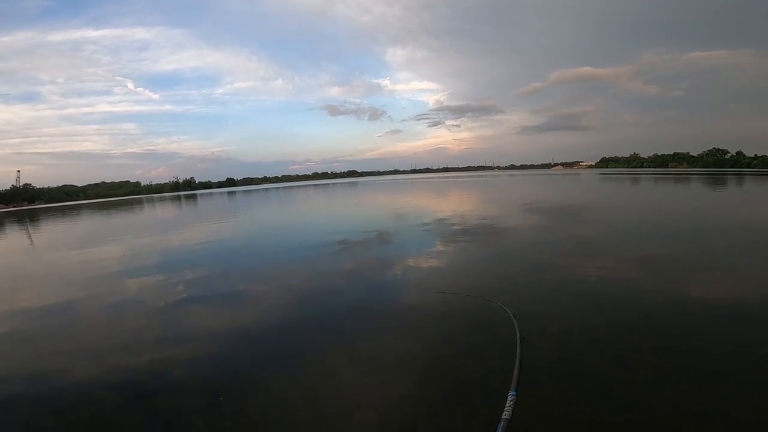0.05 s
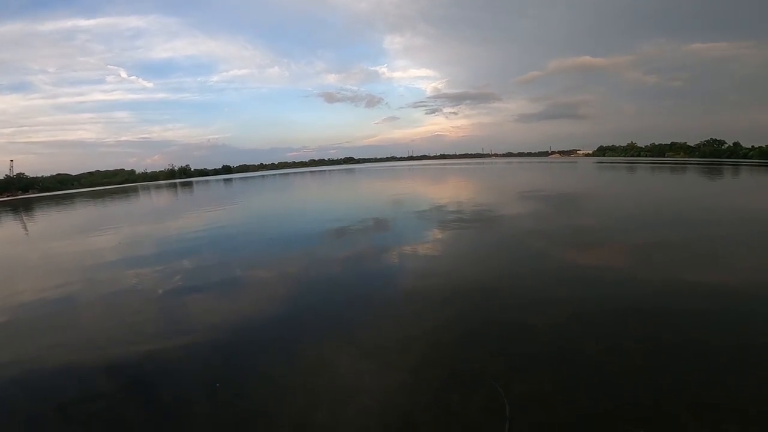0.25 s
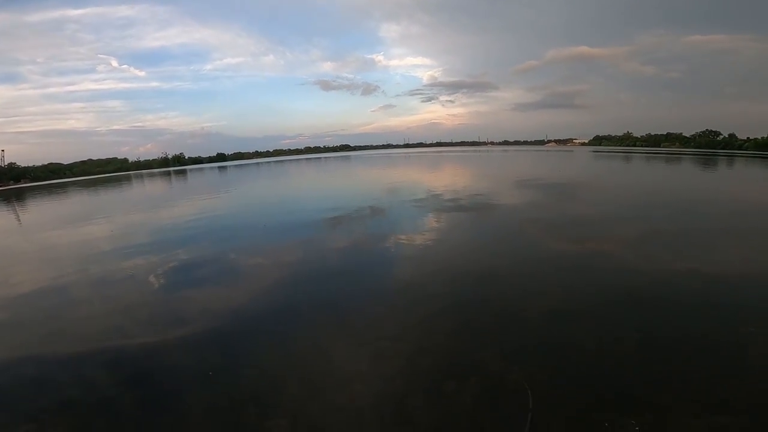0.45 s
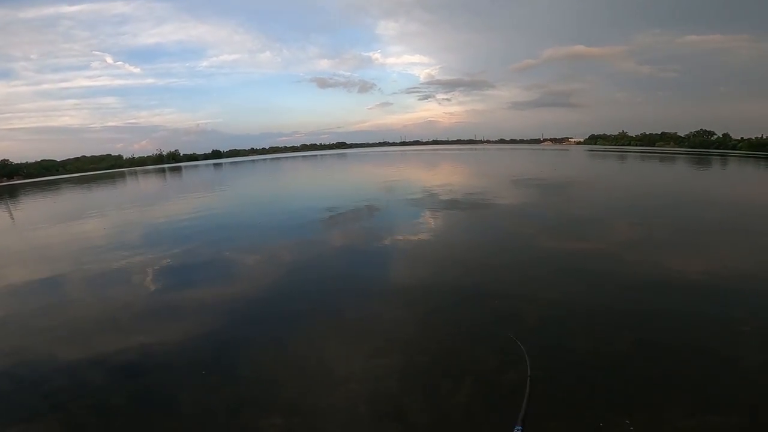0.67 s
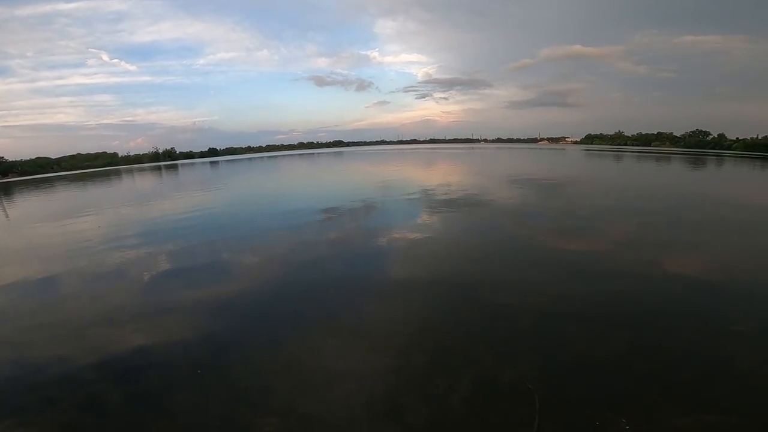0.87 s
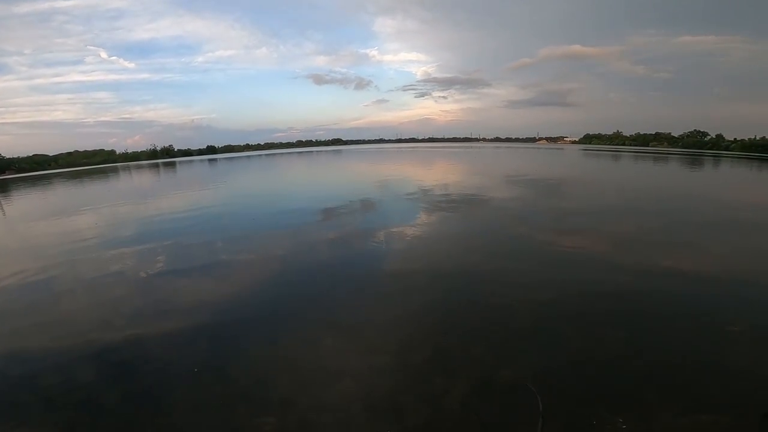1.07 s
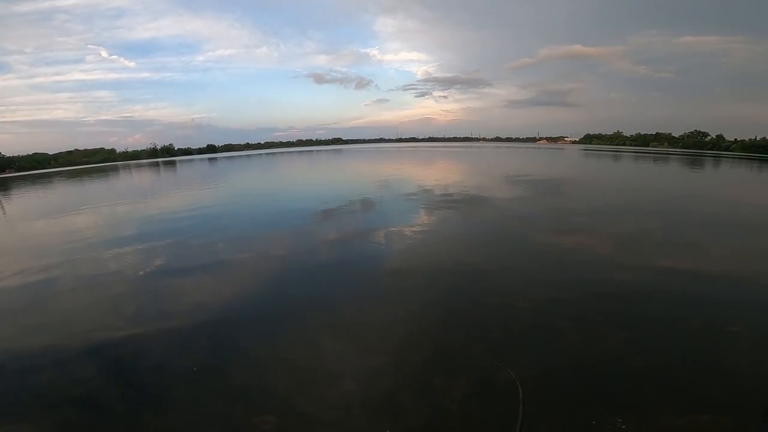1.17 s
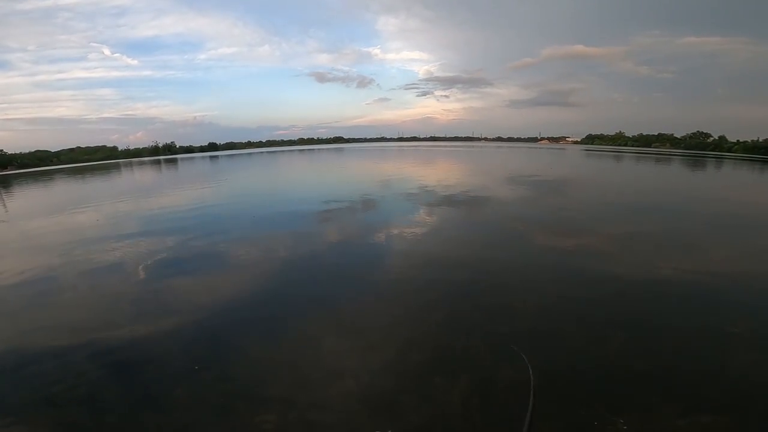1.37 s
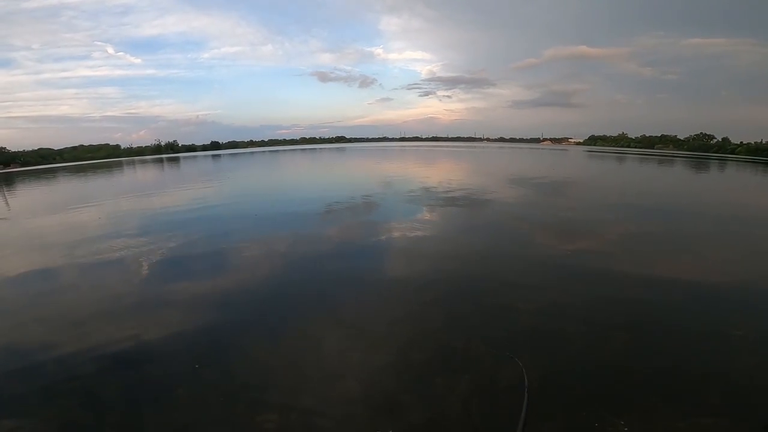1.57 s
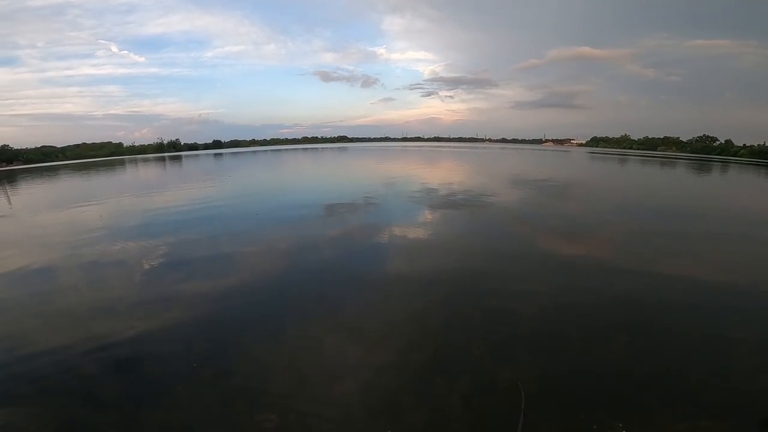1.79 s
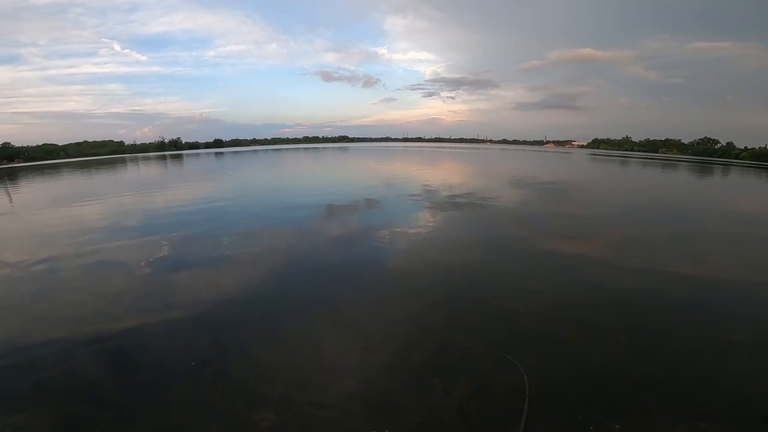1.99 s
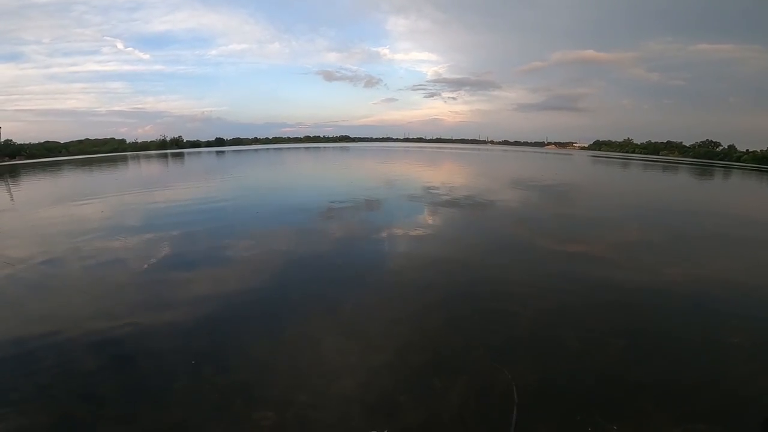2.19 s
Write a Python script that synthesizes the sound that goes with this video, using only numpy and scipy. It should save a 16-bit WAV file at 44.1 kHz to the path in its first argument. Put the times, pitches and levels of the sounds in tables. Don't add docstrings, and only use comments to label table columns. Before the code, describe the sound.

A spinning fishing reel is wound fast right by a chest-worn microphone outdoors at a quiet lake, its rough gear whine rising and falling, with regular clicks, small rattles and two low thumps of the rod butt.

```python
import sys
import numpy as np
from scipy import signal
from scipy.fft import rfft, irfft, next_fast_len
from scipy.io import wavfile
from scipy.ndimage import uniform_filter1d, map_coordinates

SR = 44100
rng = np.random.default_rng(int(sys.argv[2]) if len(sys.argv) > 2 else 0)


def nominal_scale(level):
    x = np.asarray(level, float) / 20
    return 10 ** x


def master_out(mix):
    frames = np.transpose(np.atleast_2d(mix))
    ceiling = np.clip(frames, -1, 1)
    pcm = np.round(ceiling * 32767).astype(np.int16)
    wavfile.write(sys.argv[1], SR, pcm)


N = 98607
T = np.arange(N) / SR

# start_s, tooth_pitch_hz, whine_level_db
HANDLE_TURNS = [
    [(0, 1252, -43), (.022, 650, -46), (.075, 391, -47.5), (.108, 578, -45), (.17, 543.4, -55),
     (.197, 733, -43), (.225, 600, -48.5), (.275, 465, -46), (.314, 680, -49)],
    [(.333, 1120, -40), (.348, 1100, -46), (.375, 640, -58), (.432, 485, -42), (.462, 399, -46),
     (.495, 700, -57), (.545, 414, -46), (.575, 530, -44.5), (.598, 770, -42)],
    [(.612, 1119, -45.5), (.628, 1240, -44), (.642, 899, -66), (.67, 739, -46), (.688, 641.6, -52),
     (.706, 790, -43), (.724, 780, -41.5), (.757, 429.3, -45.5)],
    [(.78, 550.4, -48), (.8, 670, -40), (.825, 466, -48), (.85, 650, -50), (.882, 790, -44), (.9, 962, -41),
     (.913, 1150, -37), (.928, 1050, -56)],
    [(.95, 638, -68), (.992, 599.4, -36.5), (1.026, 800.4, -46.5), (1.05, 719, -40.5), (1.075, 509.3, -49),
     (1.145, 395, -45.5), (1.185, 431.5, -42), (1.22, 760, -44)],
]
# start_s, tooth_pitch_hz, whine_level_db
LATER_TURNS = [
    [(1.235, 950, -41), (1.252, 1260, -38), (1.268, 1270, -40), (1.282, 900, -70), (1.32, 570, -45),
     (1.335, 660, -43.5), (1.355, 810, -37.5), (1.38, 805, -41), (1.425, 460, -47)],
    [(1.445, 450, -55), (1.475, 490, -43.5), (1.51, 530, -43.5), (1.545, 740, -46), (1.562, 930, -38),
     (1.582, 1060, -38.5), (1.594, 800, -59), (1.612, 400, -43)],
    [(1.632, 580, -47), (1.66, 620, -46.5), (1.682, 800, -40), (1.705, 720, -46), (1.745, 401.3, -52),
     (1.79, 770, -44.5), (1.82, 450, -50), (1.86, 740, -42), (1.9, 820, -44)],
    [(1.925, 680, -54), (1.95, 490, -45.5), (1.985, 590, -45), (2.012, 580, -45), (2.05, 450, -47),
     (2.112, 640, -44), (2.155, 400, -46), (2.2, 530, -41), (2.236, 830, -40.5)],
]
# multiple, level_db
TOOTH_OVERTONES = [(2, -7), (3, -6), (4, 0), (4.6, -11), (6, -15)]
# start_s, load_db, line_scrape_db
EFFORT = [(0, -38.5, -68.5), (.15, -42.5, -74), (.3, -41, -74), (.45, -38.5, -75.5), (.6, -38, -70),
          (.7, -38.5, -67.5), (.79, -39.5, -70.5), (.85, -37.5, -63), (1, -37, -68), (1.12, -38, -69.5),
          (1.22, -34.5, -68.5), (1.285, -40, -70.5), (1.39, -40, -67), (1.45, -38, -76.5),
          (1.74, -38, -71.5), (1.87, -37.5, -67), (2.05, -36.5, -68.5), (2.236, -36, -69)]
# start_s, rumble_db, extra_rattle_db
GRIP = [(0, -38.5, -0.5), (.07, -41.5, -3), (.14, -41.5, -4.5), (.3, -43.5, -9.5), (.45, -42, -6),
        (.57, -41, -3.5), (.67, -40, -2.5), (.75, -43, -2), (.84, -43, -4.5), (.9, -43.5, 9),
        (1.01, -43, 7.5), (1.09, -42, -2), (1.3, -38.5, -1.5), (1.45, -42, -8.5), (1.6, -42, -4),
        (1.85, -41.5, 6.5), (2.08, -39, 0.5), (2.236, -41.5, 0)]
# pitch_hz, level_db
GRIND_COLOUR = [(500, -7.5), (900, -2.5), (1800, 0.5), (3100, -5), (3500, -2.5), (5100, -10.5), (6000, -16),
                (9000, -61.5)]
# pitch_hz, width_hz, boost_db
HOUSING = [(1690, 300, 1.5), (2325, 260, 4), (2927, 270, 3.5), (4884, 600, 8)]
# pitch_hz, level_db
SCRAPE_COLOUR = [(5500, -3), (7000, -4), (9000, -14), (12000, -21), (13500, -28), (15200, -40)]
# pitch_hz, level_db
RUMBLE_COLOUR = [(22, -3), (33, 2.5), (80, -3), (190, -3.5), (300, -9), (500, -21.5)]
# pitch_hz, level_db
RATTLE_COLOUR = [(150, -19), (350, -1.5), (500, -2), (950, -1.5), (1700, -9), (2600, -26)]
# start_s, peak_db, edge_db
CLICKS = [
    (0.3333, -14, -27),
    (0.6216, -15, -28.5),
    (0.9125, -14.5, -25.5),
    (1.2022, -20, -37),
    (1.5825, -13.5, -28),
]
# pitch_hz, level_db, rise_ms, delay_ms
CLICK_BODY = [(2850, 0, .7, 0), (1500, -2.5, .55, .65), (850, -12, .8, .4), (2400, -16, 1.4, 2.5)]
# pitch_hz, level_db, rise_ms
CLICK_EDGE = [(9000, 0.5, 0.5), (12600, -7, 0.44), (6660, 0.5, 0.29)]
# start_s, level_db
TICKS = [
    (0.326, -29),
    (.379, -27.5),
    (0.614, -27),
    (0.678, -32),
    (0.836, -31.5),
    (0.954, -33),
    (1.248, -30),
    (1.3134, -31),
    (1.9776, -25),
]
# start_s, level_db, pitch_hz, rise_ms
KNOCKS = [(.86, -29, 383.6, 4.9), (.878, -36.5, 719, 3.4), (.93, -36, 500, 3.5), (.958, -32, 640, 1.8),
          (0.991, -28, 650, 1.4), (1.009, -30.5, 403, 5.4), (1.434, -39, 880, 5.4), (1.71, -33, 455.4, 3),
          (1.738, -30, 909, 3.3), (1.77, -29, 250, 2.5), (1.862, -34, 951, 3), (1.877, -30, 882, 3.7),
          (1.932, -32, 454.3, 1.95), (1.965, -38, 705, 3.3), (1.972, -29, 180.2, 4.2), (2.045, -38, 480, 3),
          (2.052, -38.5, 900, 3), (2.067, -32.5, 240, 3.44), (2.166, -26.5, 940, 1.95), (2.18, -36, 852, 3)]
# start_s, level_db, contact_ms
THUMPS = [(0.3973, -19.5, 1.6), (0.4033, -19.5, 0.94), (.408, -14, 0.7), (0.4132, -8.5, 1.25),
          (0.421, -22, 1.8), (0.427, -18, 1.4), (0.433, -25, 1.5), (1.1299, -20, 1.4), (1.139, -15.5, 0.86),
          (1.145, -12.5, 1.62), (1.1546, -20.5, 1.04), (1.161, -20, 0.71), (1.1644, -23, 1.1)]
# start_s, level_db, contact_ms
REBOUND = (1.15, -15, 1.2)
# pitch_hz, width_hz, level_db
CHEST = [(124, 37, -1), (281.4, 110, 7), (57.3, 250, -0.5), (490, 140, -1.5)]
# start_s, level_db, fade_by_60_db_s
SHUDDER = [
    (0.42, -29, 0.53),
    (1.165, -31, 0.62),
]
# pitch_hz, level_db
SHAKE_COLOUR = [(110, 1), (210, 1), (370, -4), (680, -13)]
# start_s, side_level_db
LEFT_DRIFT = [(0, -45), (.85, -43), (1, -27), (1.6, -21), (1.85, -15), (2.2, -15)]
# pitch_hz, level_db
PORT_COLOUR = [(40, -33), (500, -7.5), (2500, -7.5), (5000, 4), (8000, 8.5)]
# start_s, level_db
SNAGS = [(.309, -57), (.377, -55.5), (.479, -60), (.545, -58), (.658, -54), (.709, -52), (.8355, -48.5),
         (.954, -49), (1.223, -51), (1.312, -48.5), (1.347, -53.5), (1.71, -53.5), (1.767, -55.5),
         (1.803, -53.5), (1.863, -54), (1.9325, -55), (1.9724, -48), (2.218, -50)]
# start_s, level_db, pitch_hz, rise_ms
BUMPS = [(.458, -27, 223, 8.7), (.478, -30, 351, 7), (.49, -27.5, 119, 11.5), (.99, -32.5, 130, 11),
         (1.15, -28, 479.8, 7.9), (1.195, -26, 202, 8.5), (1.205, -31, 308, 8.3), (1.215, -30, 99, 11),
         (1.325, -31.5, 255.2, 9), (.02, -33.5, 36, 25), (.345, -31, 34, 17), (.635, -28, 32.7, 20),
         (.94, -35, 31.98, 18), (1.58, -32, 31, 18)]


def unit(x):
    return x / np.sqrt(np.mean(x ** 2) + 1e-20)


def curves(rows, smooth_s=.01):
    s, *cols = np.transpose(sorted(rows, key=lambda r: r[0]))
    return [uniform_filter1d(np.interp(T, s, c), int(smooth_s * SR) + 1) for c in cols]


def wobble(rate):
    return map_coordinates(rng.standard_normal(int(N * 900 / SR)), [T * min(rate, 800)])


def filtered(x, response):
    m = next_fast_len(N + 8192)
    return irfft(rfft(x, m) * response(np.fft.rfftfreq(m, 1 / SR)), m)[..., :N]


def ringing_db(hz, peaks):
    return sum(db / (1 + (2 * (hz - centre) / width) ** 2) for centre, width, db in peaks)


def noise(points, peaks=(), grain_db=0, grain_rate=300):
    low_end, high_end = (points[0][0] / 2, -70), (points[-1][0] * 1.3, -120)
    f, v = np.transpose([low_end] + list(points) + [high_end])

    def gain(hz):
        return nominal_scale(np.interp(np.log(hz + 1), np.log(f), v) + ringing_db(hz, peaks))

    grains = rng.standard_normal(N) * nominal_scale(grain_db * wobble(grain_rate))
    return unit(filtered(grains, gain))


def blip(s, db, hz, rise_ms):
    u = np.clip(T - s, 0, .2) / (rise_ms / 1000)
    return nominal_scale(db) * (u * np.exp(1 - u)) ** 2 * np.sin(2 * np.pi * hz * (T - s))


def spike(s, fade_ms):
    return np.exp(-np.abs(T - s) * 1000 / fade_ms)


def push(s, db, contact_ms):
    return nominal_scale(db) * np.exp(-((T - s) * 1000 / contact_ms) ** 2)


def gear_whine(mesh_hz, whine_db):
    phase = 2 * np.pi * np.cumsum(mesh_hz * (1 + .014 * wobble(190))) / SR
    whine = 0
    for multiple, db in TOOTH_OVERTONES:
        flutter_db, break_db = 3.2 * wobble(200), 2.2 * wobble(54.98)
        whine = whine + nominal_scale(db + flutter_db + break_db) * np.sin(multiple * phase)

    def housing(hz):
        return nominal_scale(ringing_db(hz, HOUSING)) / (1 + (hz / 5500) ** 12)

    return nominal_scale(whine_db) * filtered(whine, housing)


def gear_grind(load_db, speed_db):
    level_db = load_db - 3.5 + 0.77 * speed_db + wobble(44.9)
    return nominal_scale(level_db) * noise(GRIND_COLOUR, HOUSING, grain_db=1.5, grain_rate=250)


def line_scrape(scrape_db, speed_db):
    level_db = scrape_db + 8.0 + 0.82 * speed_db + 1.2 * wobble(18)
    return nominal_scale(level_db) * noise(SCRAPE_COLOUR, grain_db=1.4, grain_rate=710)


def cranked_reel():
    rows = [row for turn in HANDLE_TURNS + LATER_TURNS for row in turn]
    mesh_hz, whine_db = curves(rows, smooth_s=.012)
    load_db, scrape_db = curves(EFFORT)
    speed_db = 20 * np.log10(mesh_hz / 650)
    return gear_whine(mesh_hz, whine_db) + gear_grind(load_db, speed_db) + line_scrape(scrape_db, speed_db)


def hand_on_rod():
    rumble_db, rattle_db = curves(GRIP)
    rumble = nominal_scale(rumble_db + 1.6 * wobble(22)) * noise(RUMBLE_COLOUR)
    rattle = nominal_scale(rattle_db - 48 + wobble(45)) * noise(RATTLE_COLOUR, grain_db=5, grain_rate=420)
    return rumble + rattle


def bumps_and_sways():
    return sum(blip(*row) for row in BUMPS)


def line_snags():
    return noise(SCRAPE_COLOUR) * sum(nominal_scale(db) * spike(s, fade_ms=4) for s, db in SNAGS)


def grit_ticks():
    grit = noise([(1500, 4), (3000, 5), (5500, 2.5), (7000, -31), (11000, -21), (14000, -46)])
    level = 0
    for s, db in TICKS:
        onset = np.clip((T - s) / .004 + 1, 0, 1) ** 2
        level = level + nominal_scale(db - 5) * onset * spike(s, fade_ms=4.6)
    return grit * level


def roller_clicks():
    out = np.zeros(N)
    for s, peak_db, edge_db in CLICKS:
        for hz, level, rise_ms, delay_ms in CLICK_BODY:
            out -= blip(s + delay_ms / 1000, peak_db + level, hz, rise_ms)
        for hz, level, rise_ms in CLICK_EDGE:
            out += blip(s, peak_db + edge_db + level, hz, rise_ms)
    return out


def butt_thumps():
    pushes = push(*REBOUND) - sum(push(*row) for row in THUMPS)

    def chest(f):
        return sum(nominal_scale(db) * 1j * f * w / (c * c - f * f + 1j * f * w) for c, w, db in CHEST)

    return filtered(pushes, chest)


def rod_shudder():
    level = 0
    for s, db, t60 in SHUDDER:
        level = level + nominal_scale(db - 60 * np.abs(T - s) / t60) * np.clip((T - s) / 0.005, 0, 1)
    return level * nominal_scale(0.85 * wobble(60)) * noise(SHAKE_COLOUR)


def handle_knocks():
    return sum(blip(*row) for row in KNOCKS)


def port_difference(reel, body):
    side_db, = curves(LEFT_DRIFT)
    f, v = np.transpose(PORT_COLOUR)
    lag_ms = 0.04

    def colour(hz):
        return nominal_scale(np.interp(np.log(hz + 1), np.log(f), v)) * np.exp(-2j * np.pi * hz * lag_ms / 1000)

    def high_band(hz):
        return nominal_scale(-1.5 - 3) * np.exp(1.9j) / (1 + ((hz - 12450) / 1000) ** 6)

    side = nominal_scale(side_db) * (1 + 1.66 * wobble(400)) * filtered(reel + body, colour)
    return side + filtered(reel * (1 + wobble(600)), high_band)


def scene():
    reel = cranked_reel() + line_snags() + grit_ticks() + roller_clicks()
    body = hand_on_rod() + bumps_and_sways() + butt_thumps() + rod_shudder() + handle_knocks()
    side = port_difference(reel, body)
    return reel + body + np.array([side, -side])


def band_limit(x):
    return signal.sosfilt(signal.butter(12, 15480, fs=SR, output="sos"), x)


def record(dry):
    return band_limit(dry)


dry = scene()
out = record(dry)
master_out(out)
```